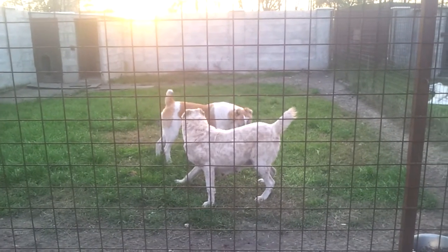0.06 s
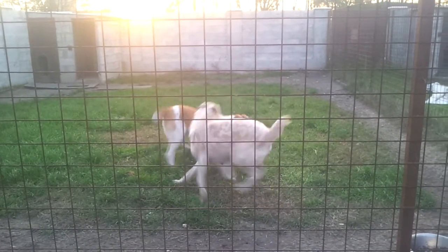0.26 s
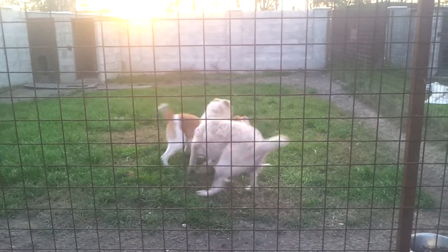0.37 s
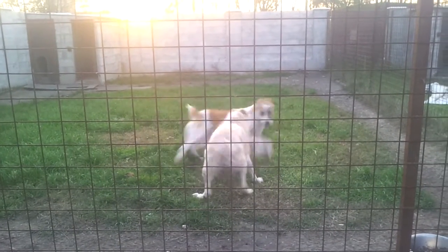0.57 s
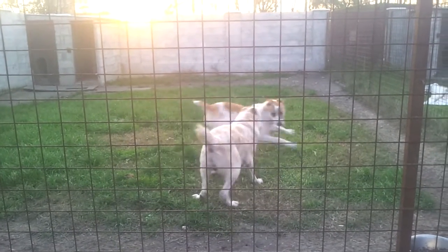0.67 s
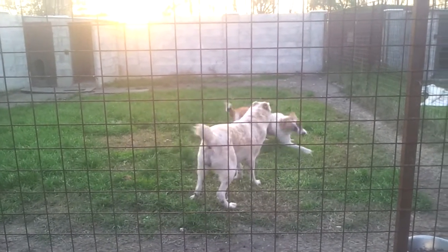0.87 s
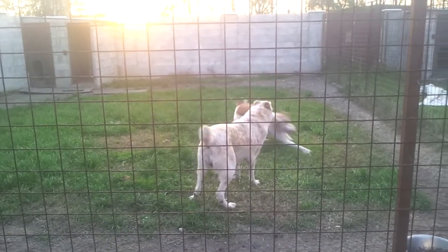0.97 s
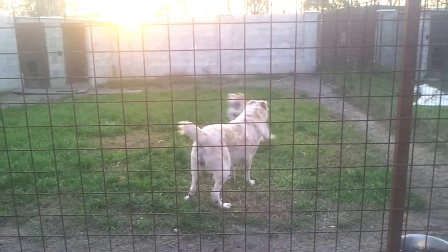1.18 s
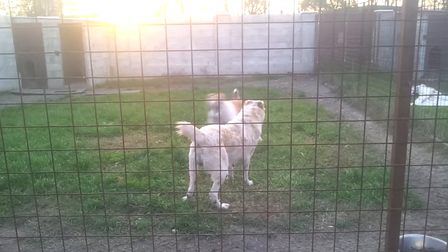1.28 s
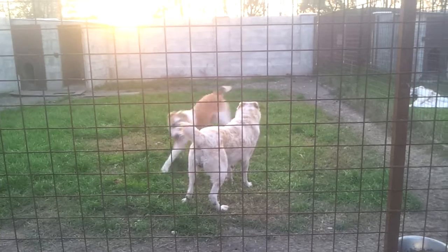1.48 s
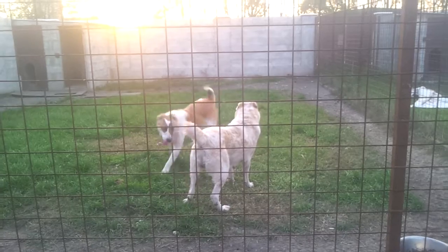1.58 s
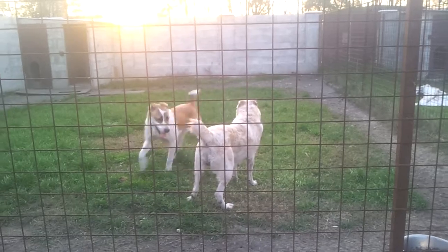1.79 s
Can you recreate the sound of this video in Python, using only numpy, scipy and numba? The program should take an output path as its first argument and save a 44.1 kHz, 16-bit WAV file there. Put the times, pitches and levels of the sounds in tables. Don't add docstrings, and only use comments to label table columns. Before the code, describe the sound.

A large dog gives three quick, loud barks a few metres from a small overloading microphone; walls echo them back, then paws thud and rustle on grass over faint distant traffic.

```python
import sys
import numpy as np
from scipy import signal
from scipy.fft import rfft, irfft, next_fast_len
from scipy.io import wavfile
from scipy.ndimage import uniform_filter1d
from numba import njit

SR = 44100
rng = np.random.default_rng(int(sys.argv[2]) if len(sys.argv) > 2 else 0)


def persist_wave(psi):
    counts = np.round(np.clip(psi, -1, 1) * 32767).astype(np.int16)
    wavfile.write(sys.argv[1], SR, np.atleast_2d(counts).T)


def ratio_of_db(decibels):
    return 10 ** (np.asarray(decibels, float) / 20)


N = 81585

# (frequency [Hz], level per hertz [dB])
TRAFFIC_SPECTRUM = [(40, -18), (200, -5), (450, -5), (900, 0.64), (2000, -11), (3600, -22), (6000, -32.5),
                    (14000, -25.5)]
# (time [s], level [dB], pitch
# [Hz])
THUDS = [(.185, -23, 730), (.005, -51, 73), (0.87, -26, 140), (.72, -32, 150), (0.48, -36.5, 210),
         (1.1, -41, 84), (1.409, -34, 150), (1.37, -37, 112), (1.573, -21.5, 184), (1.77, -47, 85)]
# (start [s], length [s], level [dB], grain rate [1/s])
GRASS_RUSTLES = [(0.345, 0.19, -42, 11000), (0.696, 0.14, -47, 14100), (0.91, 0.17, -50, 15000),
                 (1.099, 0.13, -49.5, 17000), (1.398, 0.14, -51, 8700), (1.526, 0.1, -43, 5700),
                 (1.626, 0.12, -49.5, 6500)]
# (time [s], level [dB], frequency [Hz])
GRASS_TICKS = [
    (.418, -49, 12000),
    (1.506, -20, 10800),
    (1.518, -28, 11460),
    (1.628, -34.5, 8000),
    (1.68, -37, 9100),
]
# (delay [s], level [dB], left-right difference [dB], left lag [ms])
WALL_ECHOES = [
    (.026, -14, 9, 0.17),
    (0.079, -16.5, 2.3, -0.13),
    (.112, -21, -3.5, 0.16),
    (.155, -18.5, 1.95, -0.21),
    (0.234, -20, -1.7, -0.3),
]
# (time [s], pitch [Hz], level [dB])
FIRST_BARK = [(.197, 255, -27), (.218, 268.5, -25.5), (.229, 276.6, -7.5), (.236, 325.8, -14),
              (.262, 383.5, -3), (.276, 438.9, -6), (.292, 455.7, -5.5), (.318, 432.8, -8.5),
              (.336, 388.2, -15)]
SECOND_BARK = [(.514, 215.5, -29), (.528, 249, -14.5), (.541, 313.6, -7.5), (.556, 360.3, -5),
               (.572, 413.6, -3.5), (.598, 455, -1.5), (.622, 441.2, -3), (.641, 420.7, -11),
               (.657, 354, -24.5)]
THIRD_BARK = [(.795, 204, -1), (.8, 203.6, -15), (.822, 223, -5.5), (.829, 292.7, -11), (.85, 353.5, -6.5),
              (.874, 417.4, -4.5), (.898, 434.3, -7), (.922, 416.3, -15.5), (.95, 385.6, -23.5)]
# (time [s], opening [0-1])
FIRST_JAW = [(0.199, 1.01), (0.228, 0.91), (.24, 0.82), (0.266, 0.9), (.273, 0.11), (0.329, 0.18)]
SECOND_JAW = [(.52, 0.63), (0.543, 0.61), (0.556, 0.87), (0.566, 0.082), (.64, 0.034)]
THIRD_JAW = [(.822, 0.09), (0.832, 0.89), (.848, 0.76), (0.857, 0.045), (0.938, 0.077)]
# (frequency jaw shut [Hz], frequency jaw wide [Hz], width [Hz],
# level shut [dB], level wide [dB])
THROAT_RESONANCES = [(431.3, 785, 138.4, 1.5, 1.23), (926, 1494, 152, -21.5, -7.5),
                     (1315, 1250, 147, -13.5, -39), (1786, 1597, 180, -22, -12.5),
                     (2163, 1900, 134, -23.5, -27.5), (2854, 2630, 460, -32.5, -41),
                     (4470, 4200, 370, -30.5, -36)]
# (frequency [Hz], left lead [rad])
PORT_PHASE = [(200, 2.5), (430, 1.65), (750, 1.3), (1300, .8), (1750, .3), (2250, -2), (3000, -3.2),
              (4500, -4.9)]
# (frequency [Hz], left-right level [dB])
PORT_COLOUR = [(60, 4), (200, 7), (430, 5), (750, -2), (1300, -2), (2250, -9), (4400, -3), (12000, 3.5)]

TRAFFIC_DB, TRAFFIC_APART_HZ = -34.5, 2530
THUD_CYCLES = 2.82
GRASS_HZ, GRASS_WIDTH_HZ = 10100, 18000
YARD_T60_S, YARD_DAMP, YARD_DB = 0.91, 0.093, -22
ECHO_BRIGHT_DB, ECHO_BRIGHT_HZ, ECHO_DIP, ECHO_DIP_HZ = 5, 2470, 0.59, 732
JITTER, SHIMMER_DB, HOARSE_DB = 0.004, 1.2, 9
VOICE_DB, WIDE_GAIN_DB = 2.5, 4
SLACK_DB, HISS_DB = -28.5, -24.5
BREATH_SHUT_DB, BREATH_WIDE_DB = -31, -16
LOW_CUT_HZ, CEILING, FLOOR_CLIP = 30, 1.02, -1.02


def level(x, db):
    return x * ratio_of_db(db) / np.sqrt(np.mean(x ** 2))


@njit
def svf(x, hz, width):
    y, b, l = np.empty(len(x)), 0., 0.
    for i in range(len(x)):
        g, k = np.tan(np.pi * hz[i] / SR), width / hz[i]
        v = (b + g * (x[i] - l)) / (1 + g * (g + k))
        b, l, y[i] = 2 * v - b, l + 2 * g * v, k * v
    return y


def band(x, hz, width):
    return svf(x, np.full(len(x), 1. * hz), 1. * width)


def band_twice(x, hz, width):
    return band(band(x, hz, width), hz, width)


def walk(rate):
    k = int(SR / rate)
    held = np.repeat(rng.standard_normal(N // k + 1), k)
    return 1.43 * uniform_filter1d(uniform_filter1d(held, k), k)[:N]


def later(x, s):
    return np.interp(np.arange(N) - s * SR, np.arange(N), x, left=0)


def traffic():
    out, swell, spectrum = 0, walk(7.5), np.array(TRAFFIC_SPECTRUM)
    for hz in 40 * 2 ** np.arange(0, 8.6, 0.5):
        mid = band_twice(rng.standard_normal(N), hz, hz / 2)
        side = band_twice(rng.standard_normal(N), hz, hz / 2)
        db = np.interp(np.log(hz), np.log(spectrum[:, 0]), spectrum[:, 1])
        db = db + 1.3 * swell + 0.76 * walk(11.25)
        apart = np.clip(0.13 + hz / TRAFFIC_APART_HZ, 0, 1)
        out = out + ratio_of_db(db) * (mid + apart * side * np.array([[1], [-1]]))
    return level(out, TRAFFIC_DB)


def paws():
    t, out, grains = np.arange(N) / SR, 0, 0
    for s, db, hz in THUDS:
        cycles = np.maximum(t - s, 0) * hz
        swell_and_die = cycles * np.exp(1 - cycles * 3 / THUD_CYCLES)
        out = out + ratio_of_db(db) * np.sin(2 * np.pi * cycles) * swell_and_die
    for s, length, db, rate in GRASS_RUSTLES:
        struck = rng.random(N) < rate / SR
        hits = struck * rng.standard_normal(N) * ratio_of_db(2.13 * rng.exponential(size=N))
        stroke = np.sin(np.pi * np.clip((t - s) / length, 0, 1)) ** 0.7
        grains = grains + level(hits, db) * stroke
    for s, db, hz in GRASS_TICKS:
        click = 1. * (np.arange(N) == int(s * SR))
        out = out + ratio_of_db(db) * 7 * band(band(click, hz, 0.46 * hz), hz, 0.7 * hz)
    return out + 2 * band_twice(grains, GRASS_HZ, GRASS_WIDTH_HZ * 1.5)


@njit
def walls(x, lags, gain, damp):
    line, soft, out = np.zeros((8, 8192)), np.zeros(8), np.zeros((2, len(x)))
    for i in range(len(x)):
        total = 0.
        for k in range(8):
            soft[k] += (1 - damp) * (gain[k] * line[k, (i - lags[k]) & 8191] - soft[k])
            total += soft[k]
            out[k % 2, i] += soft[k]
        for k in range(8):
            line[k, i & 8191] = x[i] + soft[k] - total / 4
    return out


def yard_tail(x):
    lags = np.array([1171, 1523, 1907, 2311, 2803, 3433, 3989, 4621])
    return ratio_of_db(YARD_DB) * walls(x, lags, ratio_of_db(-60 * lags / SR / YARD_T60_S), YARD_DAMP)


def wall_echoes(dog):
    bright = ratio_of_db(ECHO_BRIGHT_DB) * band(dog, ECHO_BRIGHT_HZ, 1.62 * ECHO_BRIGHT_HZ)
    facing = dog + bright - ECHO_DIP * band(dog, ECHO_DIP_HZ, 374)
    out = 0
    for s, db, pan_db, lag_ms in WALL_ECHOES:
        left = ratio_of_db(db + pan_db / 2) * later(facing, s + lag_ms / 1000)
        right = ratio_of_db(db - pan_db / 2) * later(facing, s)
        out = out + np.array([left, right])
    return out


def glide(table, column):
    points = np.array(table)
    return uniform_filter1d(np.interp(np.arange(N) / SR, points[:, 0], points[:, column]), size=200)


def bark(curve, jaw):
    t, c = np.arange(N) / SR, np.array(curve)
    pitch, wide = glide(curve, 1), np.clip(glide(jaw, 1), 0, 1.2)
    slack = 1 - pitch / c[:, 1].max()
    rough = ratio_of_db(HOARSE_DB * slack * 2)
    phase = 2 * np.pi * np.cumsum(pitch * (1 + JITTER * rough * walk(150))) / SR

    folds = sum(np.cos(k * phase) for k in range(1, 13)) * ratio_of_db(SHIMMER_DB * rough * walk(200))
    air = rng.standard_normal(N) * (1 + np.cos(phase))
    breath = air * ratio_of_db(BREATH_SHUT_DB + (BREATH_WIDE_DB - BREATH_SHUT_DB) * wide) * 10
    source = folds + breath

    voice = 0
    opening = np.clip(2.8 * wide, 0, 1)
    for k, (shut, opened, width, shut_db, wide_db) in enumerate(THROAT_RESONANCES):
        hz = shut + (opened - shut) * wide
        shut_db = shut_db + (k > 0) * SLACK_DB * slack
        db = shut_db + (wide_db - shut_db) * opening
        ring = svf(svf(source, hz, 1.395 * width), hz, 1.395 * width)
        voice = voice + (-1) ** k * ratio_of_db(db) * ring
    voice = voice / np.sqrt(uniform_filter1d(voice ** 2, size=600))
    voice = voice + ratio_of_db(HISS_DB) * wide * band(air, 4500, 7000)
    gate = np.clip(np.minimum(t - c[0, 0], c[-1, 0] - t) / 0.0051, 0, 1)
    return voice * gate * ratio_of_db(glide(curve, 2) + VOICE_DB + WIDE_GAIN_DB * wide)


def scene():
    dog = bark(FIRST_BARK, FIRST_JAW) + bark(SECOND_BARK, SECOND_JAW) + bark(THIRD_BARK, THIRD_JAW)
    feet = paws()
    bright = ratio_of_db(ECHO_BRIGHT_DB) * band(dog, ECHO_BRIGHT_HZ, 1.62 * ECHO_BRIGHT_HZ)
    facing = dog + bright - ECHO_DIP * band(dog, ECHO_DIP_HZ, 374)
    direct = np.array([dog + feet, dog + feet])
    return direct + wall_echoes(dog) + yard_tail(facing + feet) + traffic()


def band_limit(x):
    return signal.sosfilt(signal.butter(12, 14600, fs=SR, output="sos"), x)


def record(dry):
    size = next_fast_len(N + 4096)
    f, lead, colour = np.arange(size // 2 + 1) * SR / size, np.array(PORT_PHASE), np.array(PORT_COLOUR)
    half_db = np.interp(np.log(f + 1), np.log(colour[:, 0]), colour[:, 1]) / 2
    half_turn = np.interp(f, lead[:, 0], lead[:, 1]) / 2
    left = ratio_of_db(half_db) * np.exp(1j * half_turn)
    x = irfft(rfft(dry, size) * np.array([left, 1 / left]), size)[:, :N]
    x = signal.sosfilt(signal.butter(1, LOW_CUT_HZ, "high", fs=SR, output="sos"), x)
    x = np.clip(x, FLOOR_CLIP, CEILING)
    x = signal.sosfilt(signal.butter(2, 12000, fs=SR, output="sos"), x)
    return band_limit(np.clip(x, -1, 1))


dry = scene()
out = record(dry)
persist_wave(out)
```